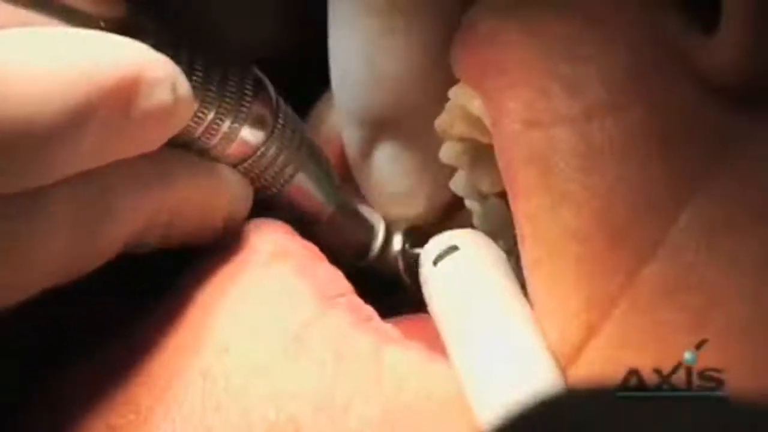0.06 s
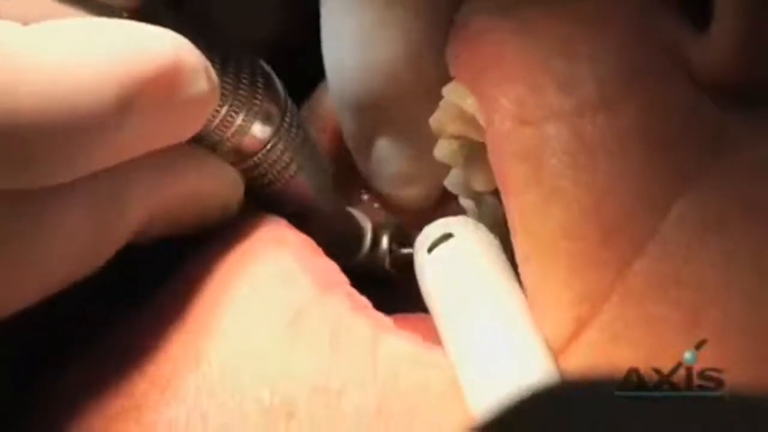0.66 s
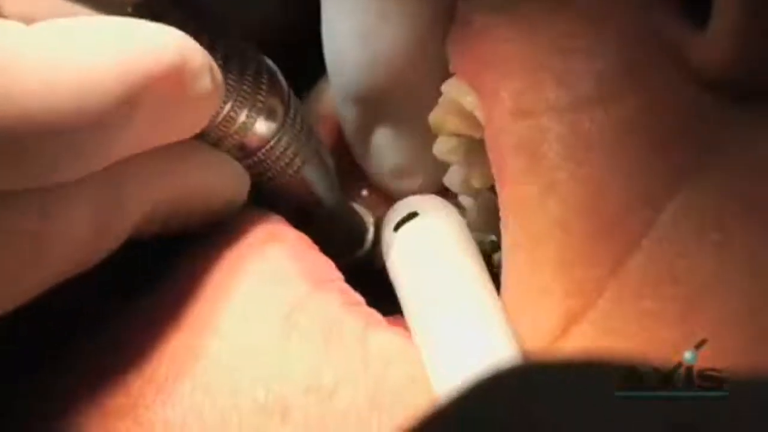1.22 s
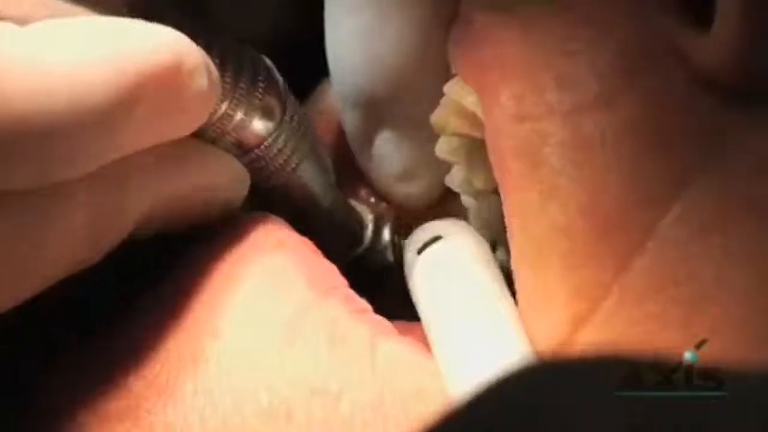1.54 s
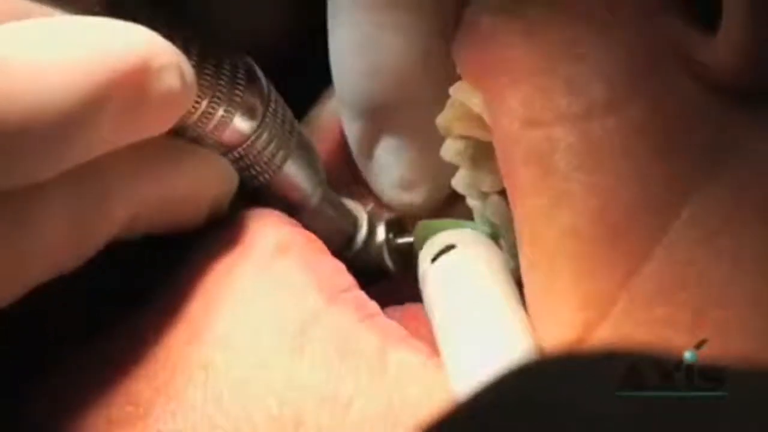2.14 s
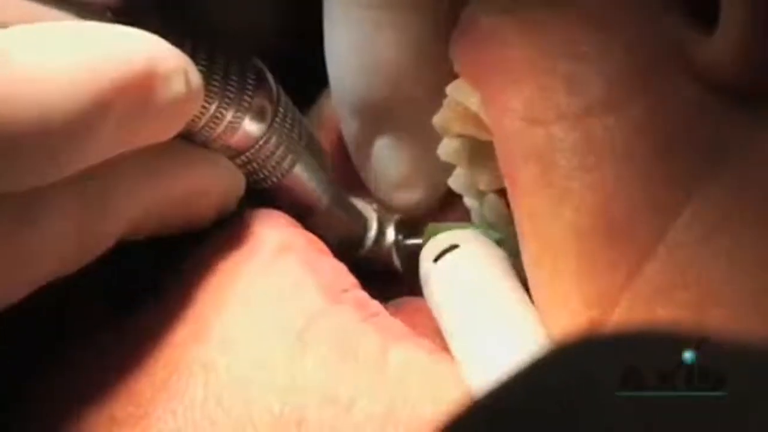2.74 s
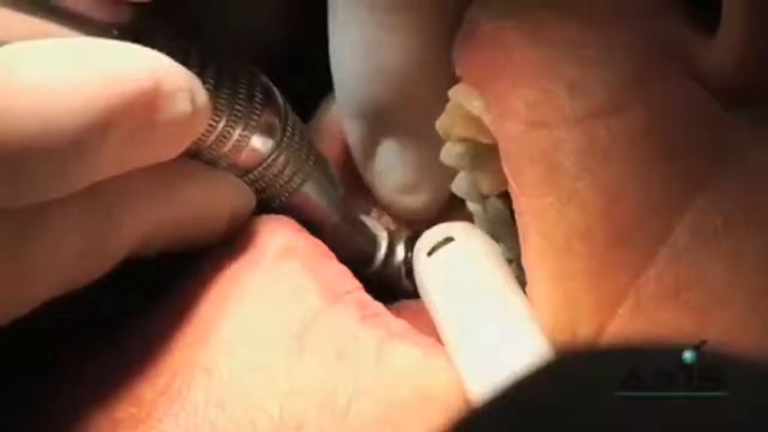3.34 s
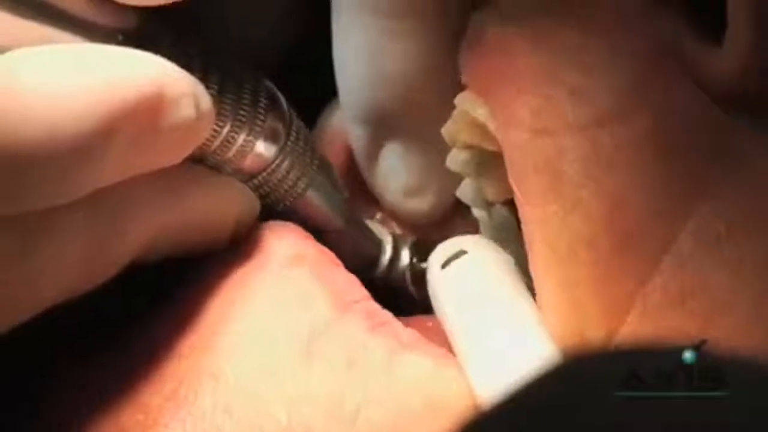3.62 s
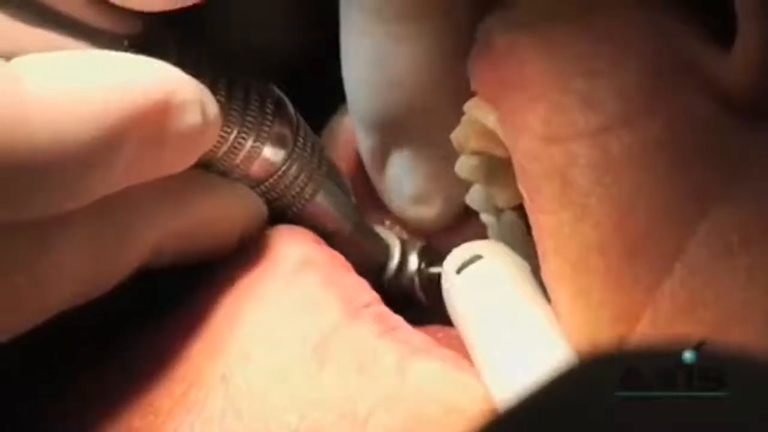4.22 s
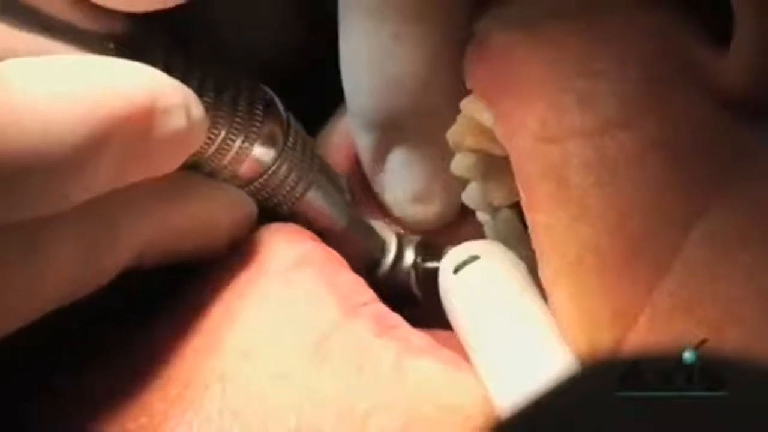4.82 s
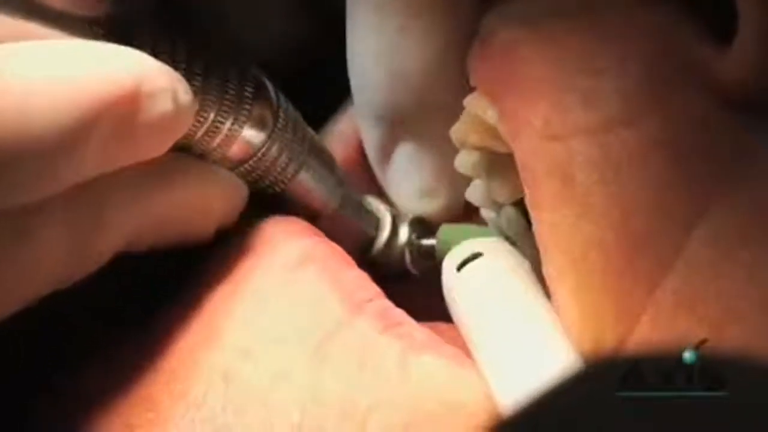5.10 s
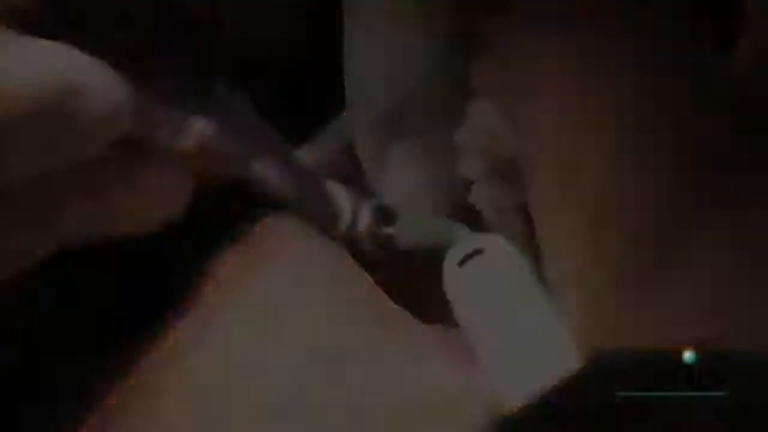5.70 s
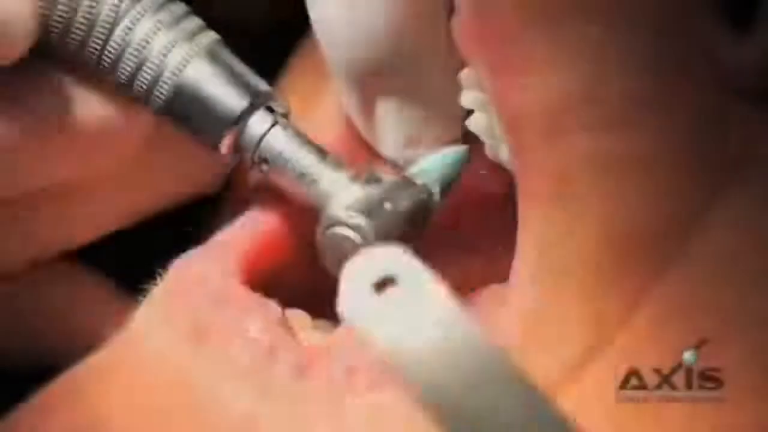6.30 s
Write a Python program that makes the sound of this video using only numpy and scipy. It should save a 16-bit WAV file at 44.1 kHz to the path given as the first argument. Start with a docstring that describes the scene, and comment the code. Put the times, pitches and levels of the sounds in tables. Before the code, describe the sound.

From the start, a dental suction tip hisses brightly in an open mouth, heard close on one microphone with almost no room sound. The hiss is high and continuous, with a softer broad rush, a faint hollow ring from the mouth and a slight flutter of moisture. Its colour shifts as the tip moves along the cheek. Between about 1 and 2 seconds the gap narrows, the mouth's ring dips and faint airy whistles swell and bend. The tone shifts again around 2.5 to 3.5 seconds, then holds fairly steady, with little change in loudness. From about 5.7 seconds the hiss fades out, reaching a very brief silence at 6.2 seconds. At about 6.3 seconds a thinner, dry, steady hiss of air, nearly all treble, quickly fades in and runs to the end.

```python
"""A bright, close hiss of air: a suction tip in an open mouth, heard on one microphone at a dentist's chair.
The dentist is polishing a tooth, but the air drowns out the handpiece, so only the air is played.
Turbulence rings in the tip and the mouth, and its colour shifts as the tip moves along the cheek.
After about six seconds the hiss is faded out, and a thinner hiss of air fades in just after."""
import sys
import numpy as np
from scipy import signal
from scipy.fft import rfft, irfft, next_fast_len
from scipy.io import wavfile
from scipy.ndimage import uniform_filter1d

SR = 44100
rng = np.random.default_rng(int(sys.argv[2]) if len(sys.argv) > 2 else 0)


def pcm_store(signal):
    """Save signal as 16-bit PCM."""
    levels = np.round(np.clip(np.atleast_2d(signal), -1, 1) * 32767)
    wavfile.write(sys.argv[1], SR, levels.astype(np.int16).T)


N = 280120


def from_db(db):
    """Decibels to gain."""
    return 10 ** (np.asarray(db) / 20)


def rms_one(x):
    """Scale to unit power."""
    return x / np.sqrt(np.mean(x ** 2) + 1e-20)


def drift(rate):
    """A smooth random wander with spread 1, changing about rate times a second."""
    step, settle = 40, 2000   # samples per point, points dropped while the filter settles
    pole = np.exp(-2 * step * np.pi * rate / SR)
    noise = rng.standard_normal(N // step + settle + 2)
    slow = signal.lfilter([1], [1, -2 * pole, pole * pole], noise)[settle:]
    return np.interp(np.arange(N) / step, np.arange(len(slow)), rms_one(slow))


def coloured(spectrum):
    """Steady noise with the given spectrum, rms 1."""
    hz, db = np.transpose(spectrum)
    size = next_fast_len(N)
    bin_hz = np.maximum(np.arange(size // 2 + 1) * SR / size, 1)
    gain = from_db(np.interp(np.log(bin_hz), np.log(hz), db))
    return rms_one(irfft(rfft(rng.standard_normal(size)) * gain, size)[:N])


def resonate(modes, flicker_db):
    """Eddies drive each resonance separately, with a strength that flickers; rms 1."""
    out = np.zeros(N)
    for hz, width, db in modes:
        edges_hz = [max(hz - width / 2, 20), hz + width / 2]
        band = signal.butter(2, edges_hz, "band", fs=SR, output="sos")
        strength = from_db(db + flicker_db * drift(14.3))
        out += strength * signal.sosfilt(band, rng.standard_normal(N))
    return rms_one(out)


def glide(x, shift_hz):
    """Slide a group of resonances up or down."""
    analytic = signal.hilbert(x, next_fast_len(N))[:N]
    return np.real(analytic * np.exp(2j * np.pi * np.cumsum(shift_hz) / SR))


# The tip's travel along the cheek. Each row: time in seconds, share of the way from 0 to 1.
TIP_SLIDE = [(0, 0), (.65, 0.01), (.95, 0.4), (1.5, .35), (2.6, 1), (3.4, .85), (3.65, .08), (5.0, .1),
             (5.85, .45)]
# How close it sits to the cheek. Each row: time in seconds, narrowness of the gap from 0 to 1.
GAP_NARROWNESS = [(0, 0.2), (.3, 0.27), (1.02, 0.38), (1.2, .8), (1.5, 0.95), (1.75, 0.88), (2.05, 0.55),
                  (2.35, .48), (2.8, 0.04), (3.35, 0), (3.65, 0.35), (4.05, .22), (5.0, .25), (5.85, 0)]
# Its lean to either side. Each row: time in seconds, tilt from -1 to 1.
TIP_TILT = [(0, -.3), (2.2, 0.18), (2.8, 0.069), (3.25, -.8), (3.6, -.75), (4.3, 0.036), (5.8, 0.96)]

def tip_pose():
    """Slide, narrowness and tilt at every sample: the three movements that colour the hiss."""
    t = np.arange(N) / SR
    return np.array([np.interp(t, *np.transpose(path)) for path in (TIP_SLIDE, GAP_NARROWNESS, TIP_TILT)])


def follow(pose, law):
    """A level or pitch from its law: value at rest, then change per unit of slide, narrowness, tilt."""
    return law[0] + np.dot(law[1:], pose)


# The jet, right at the tip's opening. Each row: pitch in Hz, width in Hz, relative level in dB.
JET_MODES = [(6355, 560, -7.5), (6910, 470, -6.5), (7370, 490, -0.5), (7920, 370, -2), (8330, 300, -7.5),
             (8620, 440, -2.5), (9123, 540, -3.5)]
JET_DB, JET_SHIFT_HZ = (-15.5, 0.5, -0.34, -0.84), (10, 30, -85, -50)   # laws for follow()

def jet(pose):
    """Air tears over the rim of the tip: the loudest part of the hiss, gliding as the tip moves."""
    level_db = follow(pose, JET_DB) + 0.3 * drift(rate=25)
    hiss = resonate(JET_MODES, flicker_db=0.5)
    return from_db(level_db) * glide(hiss, follow(pose, JET_SHIFT_HZ))


# The open mouth around the tip. Each row: pitch in Hz, width in Hz, relative level in dB.
MOUTH_MODES = [(338.5, 92, -11.5), (537, 104, -10.5), (727, 57, -12), (860, 74, -11), (1120, 210, -5.5),
               (1265, 29, .5), (1332, 51, 0.5), (1408.5, 63, 2), (1494, 110, -1.5), (1614, 89, -2.5),
               (1776, 222, -5)]
# Brief swells of its ring. Each row: peak time in seconds, half length in seconds, rise in dB.
MOUTH_SWELLS = [(1.005, 0.089, 4), (2.055, 0.038, 4.5), (2.92, .15, 3), (3.34, 0.078, 2.2),
                (3.78, 0.022, 4.5), (5.08, .1, 2)]
MOUTH_DB = (-30, -1.5, -8, -0.1)

def mouth_ring(pose):
    """Turbulence rings low in the mouth, wavering all the time and swelling now and then."""
    t = np.arange(N) / SR
    swell_db = sum(db * np.exp(-((t - peak_s) / half_s) ** 2) for peak_s, half_s, db in MOUTH_SWELLS)
    level_db = follow(pose, MOUTH_DB) + swell_db + 0.9 * drift(rate=20)
    return from_db(level_db) * resonate(MOUTH_MODES, flicker_db=1.4)


# Close on the tip: its bore, its rim and the spray.
# Each row: pitch in Hz, width in Hz, relative level in dB.
BORE_MODES = [(3035, 202, 0.5), (3398, 300, -0.5), (3655, 203, -0.5), (4090, 64, -6)]
RIM_MODES = [(4308, 97, -11.5), (4505, 100, -12.5), (9960, 630, -3.5), (10680, 780, -0.5),
             (11260, 560, -9.5), (12080, 340, -9)]
SPRAY_MODES = [(13300, 460, 0), (13950, 500, 0), (14600, 700, -2), (15300, 900, -1)]
BORE_DB, RIM_DB, SPRAY_DB = (-29.5, -1.0, 0, 0.5), (-18, -3.5, -0.3, 0.2), (-30, -5, 1.5, 0.1)

def tip_ring(pose):
    """The air rings in the bore and at the rim, and spray adds the highest fizz."""
    bore = from_db(follow(pose, BORE_DB)) * resonate(BORE_MODES, flicker_db=1.0)
    rim = from_db(follow(pose, RIM_DB)) * resonate(RIM_MODES, flicker_db=0.94)
    spray = from_db(follow(pose, SPRAY_DB)) * resonate(SPRAY_MODES, flicker_db=0.0)
    return bore + rim + spray


# The bed of air noise at the chair. Each row: frequency in Hz, relative level in dB.
RUSH_SPECTRUM = [(20, -13), (45, -3.5), (100, -5), (200, -4), (245, -4), (300, -3), (450, -4.5),
                 (620, -4.5), (800, -5.5), (1200, -6.5), (2200, -2.5), (4200, -3), (7000, 2), (16000, -6)]
RUSH_DB = (-25, -2.3, -0.5, 0)

def rush(pose):
    """The drawn air makes a broad rush under the resonances."""
    return from_db(follow(pose, RUSH_DB)) * coloured(RUSH_SPECTRUM)


# The side leak, between tip and cheek. Each row: pitch in Hz, width in Hz, relative level in dB.
LEAK_MODES = [(4984, 280, -0.51), (5175, 140, 1.3), (6093, 160, 2)]
HOLLOW_DB, LEAK_DB = (-48, 13, 6.5, -1), (-30, -1.3, 3, -2.5)
LOW_WHISTLE_HZ, LOW_WHISTLE_DB = (5596, -20, -150, -20), (-30, -0.2, 8, 0.5)
HIGH_WHISTLE_HZ, HIGH_WHISTLE_DB = (12400, 30, 340, -110), (-31.2, 2.2, 3, 3)

def cheek_gap(pose):
    """The gap beside the tip adds a hollow ring, a leak and two whistles that swell as it narrows."""
    hollow = from_db(follow(pose, HOLLOW_DB)) * resonate([(2740, 330, 0)], flicker_db=2.5)
    leak = from_db(follow(pose, LEAK_DB)) * resonate(LEAK_MODES, flicker_db=2.1)
    low = whistle(pose, LOW_WHISTLE_HZ, LOW_WHISTLE_DB, width_hz=390)
    high = whistle(pose, HIGH_WHISTLE_HZ, HIGH_WHISTLE_DB, width_hz=480)
    return hollow + leak + low + high


def whistle(pose, pitch_law, level_law, width_hz):
    """One broad, airy resonance of the gap, bending in pitch with the tip."""
    rest_hz = pitch_law[0]
    band = resonate([(rest_hz, width_hz, 0)], flicker_db=1.23)
    return from_db(follow(pose, level_law)) * glide(band, follow(pose, pitch_law) - rest_hz)


# Bands where paths round the tip interfere on the way to the microphone.
# Each row: width in Hz, law of the pitch in Hz, law of the gain in dB.
PATH_NULLS = [ (400, (2480, -260, -480, 15), (-5.5, 5, -4, -0.5)), (520, (4320, -60, 40, 30),
              (-1.84, 1, 4.5, 1)), (198, (5338, -30, -230, 150), (-2.5, -.9, -2, -.5)),
              (300, (6788, -60, 150, 110), (-0.5, -5, 3, 5.5)), (230, (8310, -230, -30, 100),
              (-12.5, 12.5, 3.5, -2)), (300, (9660, -60, 120, 20), (-3, 3.5, 0.5, 4.5)),
              (380, (11890, -400, -100, -150), (-8.5, 0, 4, 2)), (330, (13480, 150, 60, -20),
              (-1, 0, .5, -.3)), ]

def interference(x, pose):
    """Narrow, sliding bands of the hiss drop where the paths cancel and lift where they add."""
    for width_hz, pitch_law, gain_law in PATH_NULLS:
        carrier = np.exp(2j * np.pi * np.cumsum(follow(pose, pitch_law)) / SR)
        pole = np.exp(-np.pi * width_hz / SR)
        band = 2 * np.real(carrier * signal.lfilter([1 - pole], [1, -pole], x / carrier))
        x = x - (1 - from_db(follow(pose, gain_law))) * band
    return x


def sputter(slow_db, fast_db):
    """Moisture passing through the tip makes the whole stream flutter."""
    return from_db(slow_db * drift(rate=31) + fast_db * drift(rate=210))


# Hard surfaces near the chair and the microphone. Each row: delay in seconds, signed gain.
NEAR_ECHOES = [(.00159, .07), (.00322, .07), (.00757, -.07), (.00787, .09), (.00841, -.07), (.00887, -.07)]

def surroundings(x, cutoff_hz=6800):
    """Short, dull reflections ripple the colour of the hiss."""
    n = np.arange(N)
    dull = signal.sosfilt(signal.butter(1, cutoff_hz, fs=SR, output="sos"), x)
    return x + sum(gain * np.interp(n - round(delay * SR), n, dull, left=0) for delay, gain in NEAR_ECHOES)


# The closing hiss, dry at the microphone. Each row: frequency in Hz, relative level in dB.
THIN_SPECTRUM = [(30, -19), (500, -21), (1700, -17.5), (4400, -16.5), (4900, -7), (6200, -6), (7300, 0.5),
                 (8500, -6), (10000, -1), (11200, -7), (13000, -7), (15700, -15)]

def thin_hiss():
    """A steady hiss of air, nearly all treble."""
    return from_db(-22.0) * coloured(THIN_SPECTRUM)


FADE_OUT_END_S, FADE_OUT_LENGTH_S = 6.22, 0.49
FADE_IN_START_S, FADE_IN_LENGTH_S = 6.261, 0.09

def fader(travel, curve, ease_s=0.034, closed_db=-62):
    """Gain of a fader from its travel, 0 closed to 1 open, with eased corners."""
    gain = np.clip(travel, 0, 1) ** curve
    return uniform_filter1d(gain, round(ease_s * SR) + 1, mode="nearest") + from_db(closed_db)


def scene():
    """At the chair, in mono: the suction hiss gives way to the thinner hiss through a brief silence."""
    t = np.arange(N) / SR
    pose = tip_pose()
    suction = jet(pose) + mouth_ring(pose) + tip_ring(pose) + rush(pose) + cheek_gap(pose)
    stream = interference(suction, pose) * sputter(slow_db=0.41, fast_db=0.53)
    fade_out = fader((FADE_OUT_END_S - t) / FADE_OUT_LENGTH_S, curve=0.72)
    fade_in = fader((t - FADE_IN_START_S) / FADE_IN_LENGTH_S, curve=1)
    return (surroundings(stream) * fade_out + thin_hiss() * fade_in)[None]


CUTOFF_HZ = 15780

def record(dry):
    """The rare highest peaks are held below a fixed limit, and the top is cut steeply."""
    clipped = np.clip(dry, -.8, .8)
    return signal.sosfilt(signal.ellip(14, .1, 90, CUTOFF_HZ, fs=SR, output="sos"), clipped)


dry = scene()
out = record(dry)
pcm_store(out)
```